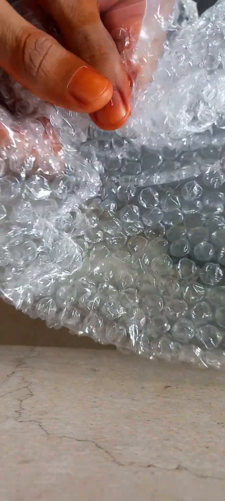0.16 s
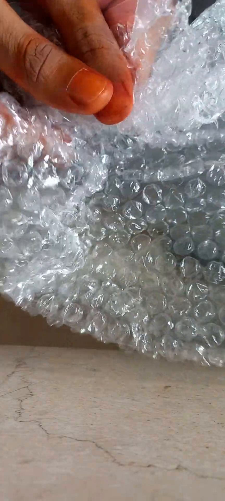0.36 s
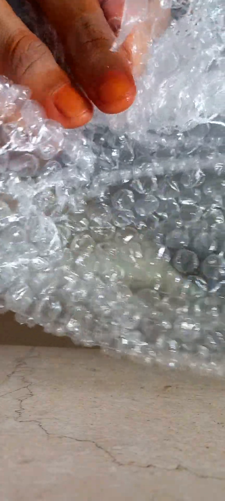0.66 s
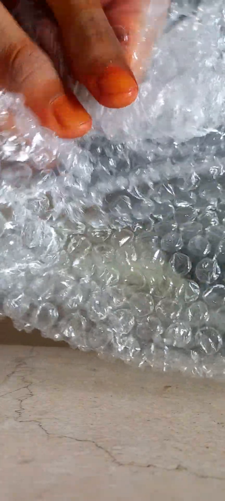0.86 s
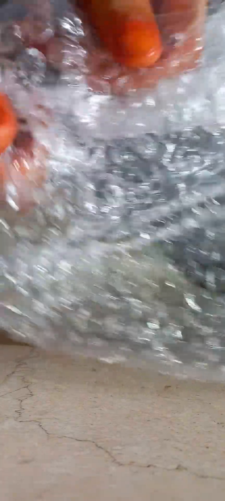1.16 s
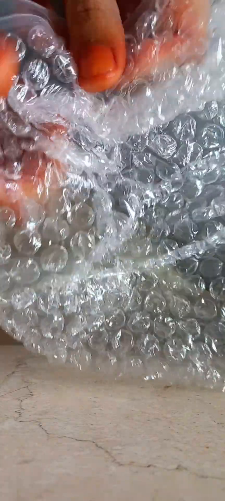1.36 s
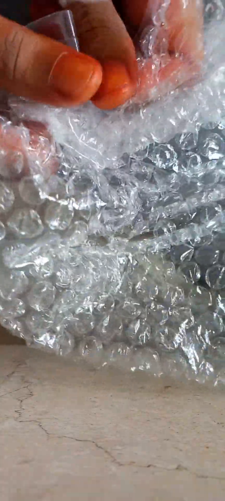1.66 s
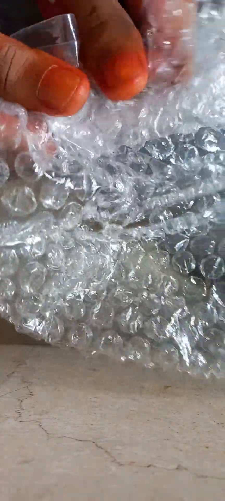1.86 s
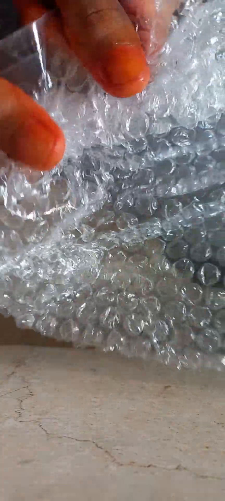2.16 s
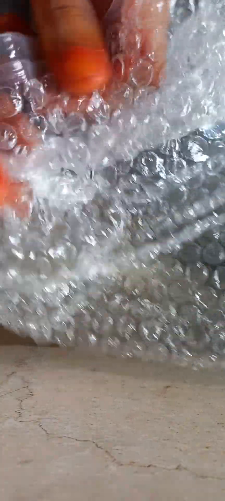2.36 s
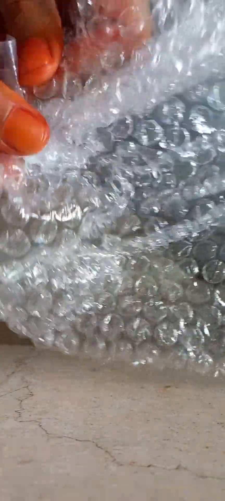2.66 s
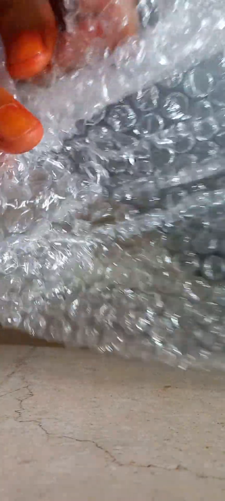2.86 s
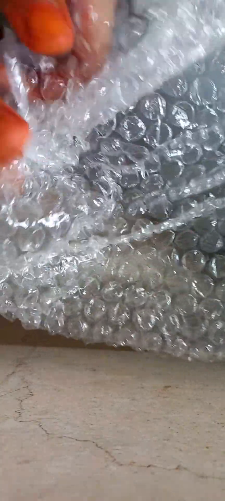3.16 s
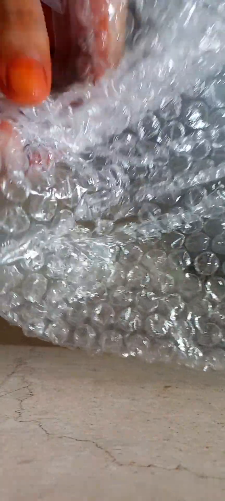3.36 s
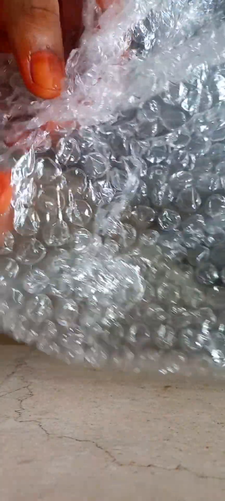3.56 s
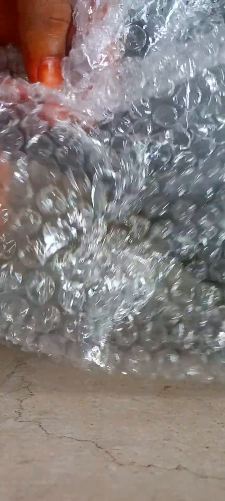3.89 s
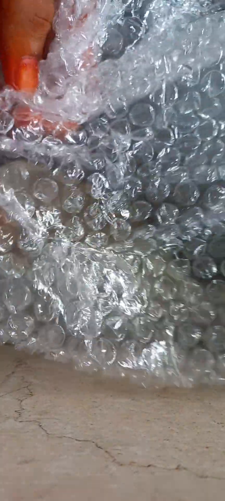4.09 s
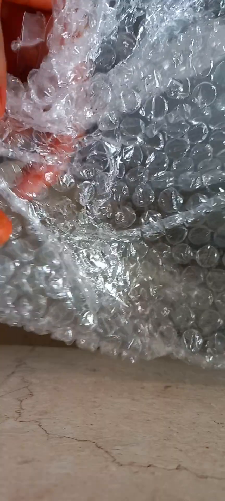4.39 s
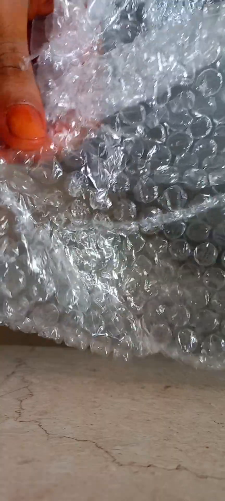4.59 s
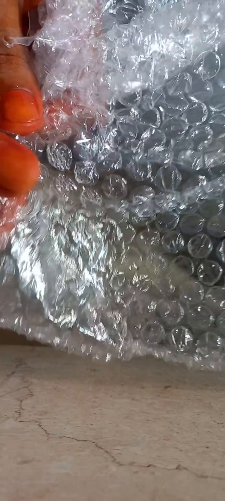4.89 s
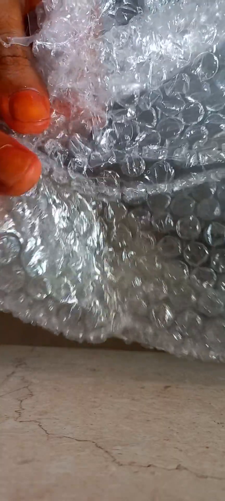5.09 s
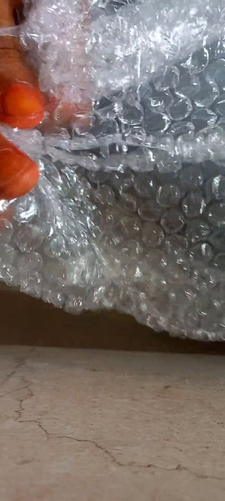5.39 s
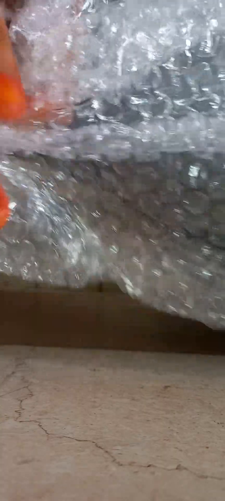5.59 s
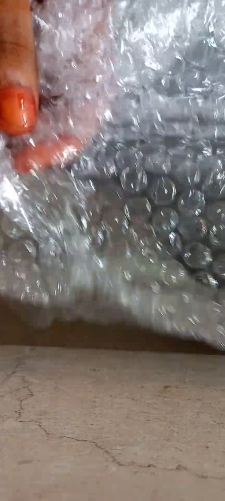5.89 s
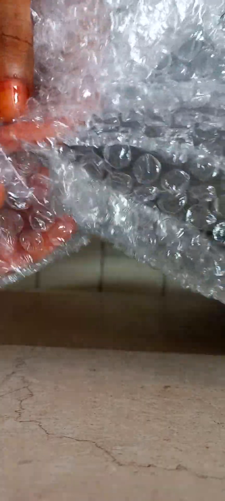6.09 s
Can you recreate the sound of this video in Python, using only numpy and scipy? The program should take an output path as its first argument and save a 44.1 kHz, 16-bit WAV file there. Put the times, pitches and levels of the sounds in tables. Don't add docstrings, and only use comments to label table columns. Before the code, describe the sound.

Hands squeeze and twist plastic bubble wrap close by, crinkling steadily with sharp bubble pops and dry snaps in a bare, echoing room over faint hum.

```python
import sys
import numpy as np
from scipy import signal
from scipy.fft import rfft, irfft
from scipy.io import wavfile
from scipy.ndimage import uniform_filter1d

SR = 44100
rng = np.random.default_rng(int(sys.argv[2]) if len(sys.argv) > 2 else 0)


def generate_wav(signal):
    frames = np.transpose(np.atleast_2d(signal))
    scaled = np.clip(frames, -1, 1) * 32767
    pcm = np.round(scaled).astype(np.int16)
    wavfile.write(sys.argv[1], SR, pcm)


def linear_from_db(decibels):
    return 10 ** (np.asarray(decibels, float) / 20)


N = 275184
START_DELAY_S = 0.0007


def evened(x):
    return x / np.sqrt(np.mean(x ** 2) + 1e-20)


def read(points, hz):
    f, value = np.transpose(points)
    return np.interp(np.log(hz + 1), np.log(f + 1), value)


def causal(gain_db):
    mirrored_db = np.r_[gain_db, gain_db[-2:0:-1]]
    log_gain = np.log(linear_from_db(np.maximum(mirrored_db, -100)))
    return np.fft.ifft(np.exp(np.conj(signal.hilbert(log_gain)))).real[:len(gain_db) - 1]


def band(x, lo_hz, hi_hz):
    return signal.sosfilt(signal.butter(2, [lo_hz, hi_hz], "bandpass", fs=SR, output="sos"), x)


def add(mix, s, sound):
    part = mix[round((s + START_DELAY_S) * SR):][:len(sound)]
    part += sound[:len(part)]


def joined(levels_db, rest_db):
    return np.sqrt((linear_from_db(levels_db) ** 2).sum(0) + linear_from_db(rest_db) ** 2)


# hz, likeness (0 to 1)
HUM_LIKENESS = [(60, 0.88), (150, 0.89), (400, 0.57), (1000, 0.22)]


def spread_noise(power):
    likeness = np.clip(read(HUM_LIKENESS, np.fft.rfftfreq(N, 1 / SR)), -1, 1)
    left, other = rfft(rng.standard_normal((2, N)))
    right = likeness * left + np.sqrt(1 - likeness ** 2) * other
    return evened(irfft(np.array([left, right]) * np.sqrt(power), N))


# hz, level_db (per Hz)
HUM_COLOUR = [(82, -20), (140, 4), (280, -5.5), (1590, -83), (1980, -23), (2770, -41), (5020, -24),
              (6120, -16), (7910, -53), (12500, -30), (15800, -14)]


def hum_floor():
    hz = np.fft.rfftfreq(N, 1 / SR)
    return linear_from_db(-55.5) * spread_noise(linear_from_db(read(HUM_COLOUR, hz)) ** 2)


def steadied(x, share):
    power = uniform_filter1d(uniform_filter1d((x ** 2).mean(0), size=5000), size=5000)
    return evened(x / (abs(power) + 0.03) ** (share / 2))


# pitch_hz, width_hz, level_db
MOTOR_TONES = [(99.15, 4.9, 2), (169.3, 3.26, -8), (109, 28.4, -9), (73.6, 25, -16.5)]
# time_s, level_db
DRONE_SWELL = [(0.0, -61.5), (0.21, -50), (0.42, -63), (0.52, -47.5), (0.82, -47.5), (1.02, -52),
               (1.36, -49), (2.59, -51), (2.82, -63), (3.04, -48), (3.42, -57), (3.6, -47), (4.05, -54),
               (4.19, -48.5), (5.49, -51), (5.61, -53.5), (6.01, -47), (6.24, -51)]


def drone(jolt):
    hz = np.fft.rfftfreq(N, 1 / SR)
    tones = sum(linear_from_db(db) ** 2 * np.exp(-2 * ((hz - pitch_hz) / width_hz) ** 2)
                for pitch_hz, width_hz, db in MOTOR_TONES)
    level = linear_from_db(np.interp(np.arange(N) / SR, *np.transpose(DRONE_SWELL))) + jolt
    return level * steadied(spread_noise(tones), 0.53)


def rumble(jolt):
    deep = np.exp(-2 * ((np.fft.rfftfreq(N, 1 / SR) - 58) / 18) ** 2)
    level = linear_from_db(np.interp(np.arange(N) / SR, [1.7, 1.8], [-75, -91.5])) + linear_from_db(-12) * jolt
    return linear_from_db(11.5) * level * spread_noise(deep)


# middle_s, level_db, length_s
FLOOR_JOLT = (2.005, -30, 0.052)


def hum():
    middle_s, db, length_s = FLOOR_JOLT
    jolt = linear_from_db(db) * np.exp(-(2 * (np.arange(N) / SR - middle_s) / length_s) ** 2)
    return hum_floor() + drone(jolt) + rumble(jolt)


# hz, level_db
MIC_RESPONSE = [(90, -70), (150, -5.5), (260, -1), (740, -0.5), (1600, -1), (3000, 1), (4700, 4.5),
                (6200, -0.5), (8300, -16), (10500, -9.5), (12500, -8), (15600, -13)]


def microphone_db(hz):
    return read(MIC_RESPONSE, hz)


def grains(lo_hz, hi_hz, per_s, spread_db, cycles, brush):
    clumps = linear_from_db(4.5 * evened(uniform_filter1d(rng.standard_normal(N), 900)))
    happens = rng.random(N) < clumps * per_s / SR
    size = linear_from_db(spread_db * np.minimum(rng.exponential(1, N), 5)) * happens
    pitches, t = np.geomspace(lo_hz, hi_hz, 8), np.arange(600) / SR
    kind = rng.integers(0, len(pitches), N)
    creases = np.zeros(N)
    for k, hz in enumerate(pitches):
        ring = np.sqrt(hz) * np.sin(2 * np.pi * hz * t) * np.exp(-hz * t / cycles)
        creases += signal.oaconvolve(size * (kind == k), ring)[:N]
    brushing = band(rng.standard_normal(N), 0.48 * lo_hz, min(hi_hz, SR / 2.2))
    colour = causal(microphone_db(np.fft.rfftfreq(2048, 1 / SR)))
    return evened(signal.oaconvolve(evened(creases) + brush * evened(brushing), colour)[:N])


# loudest_s, build_up_s, drag_db, slack_rustle_db
SLIDE_MOVES = [(0.14, 0.04, -63, -42.5), (0.51, .03, -64, -60), (0.6, 0.046, -44, -50.5),
               (0.7, 0.026, -46, -41), (0.89, 0.024, -46, -68), (1.2, 0.32, -51.5, -74),
               (2.0, 0.072, -38, -72), (2.64, 0.11, -80, -63.5), (3.0, 0.031, -77, -47),
               (3.53, 0.18, -56, -50.5), (3.95, 0.15, -52.5, -48), (4.29, 0.011, -37.5, -36.5),
               (4.67, 0.12, -47, -71), (5.04, 0.13, -59, -55), (5.39, 0.04, -47.5, -51),
               (5.72, 0.078, -56.5, -57.5), (5.91, 0.054, -50.5, -56), (6.04, .06, -54, -56)]


def slides(column):
    rows = np.transpose(SLIDE_MOVES)[:, :, None]
    t = np.arange(N) / SR - rows[0]
    shape_db = np.where(t < 0, 12 * t / rows[1], -85 * t)
    return joined(rows[column] + shape_db, -96)


# middle_s, length_s, effort_db, tautness_db
HAND_STROKES = [(0.0, 0.029, -47, 4), (0.226, 0.26, -41.5, -6), (0.493, 0.13, -55.5, 0.5),
                (0.76, 0.27, -60, 11.5), (1.18, 0.6, -52, 0.5), (1.571, 0.2, -49.5, 0),
                (1.832, 0.9, -57.5, 2.5), (2.35, 0.22, -49.5, -1.5), (2.59, 0.058, -58, 4.5),
                (2.677, 0.059, -55, 8.5), (2.984, 0.23, -53, -17), (3.22, 0.24, -53, 0),
                (3.526, 0.25, -46, -1), (3.755, 0.096, -47.5, -2.5), (3.934, 0.19, -46, 2.5),
                (4.293, 0.42, -57, 6), (4.624, 0.21, -47.5, -1.5), (4.974, 0.085, -50.5, 0),
                (5.04, 0.11, -60, 12), (5.308, 0.28, -56, 17), (5.655, 0.23, -50.5, 2),
                (5.746, 0.091, -55, 4), (5.952, 0.17, -47, 2.5), (6.056, 0.1, -50.5, 3.5),
                (6.19, 0.11, -50.5, 2)]
REST_DB = -67.5


def crinkle():
    middle_s, length_s, effort_db, taut_db = np.transpose(HAND_STROKES)[:, :, None]
    shape_db = -10 * abs(2 * (np.arange(N) / SR - middle_s) / length_s) ** 1.58
    mid = joined(effort_db + shape_db, REST_DB)
    high = joined(effort_db + taut_db + shape_db, REST_DB - 1)
    crackle = grains(2000, 6500, 1000, 4.1, 1.1, 0.15)
    fizz = grains(10000, 15500, 750, 3.4, 1.0, 0.3)
    rustle = grains(410, 1200, 350, 4.5, 1.4, 0.3)
    clicks = grains(3000, 15000, 120, 3, 0.3, 0.02)
    return mid * crackle + high * fizz + slides(column=3) * rustle + linear_from_db(-11) * np.sqrt(mid * high) * clicks


def shock(peak_db, bass_db, treble_db, ring_hz, ring_db, ring_share):
    hz = np.fft.rfftfreq(2048, 1 / SR)
    low = 1 / (1 + (hz / 1700) ** 4)
    high = 1 / (1 + (9500 / (hz + 1)) ** 8)
    ring = ring_db / (1 + ((hz - ring_hz) / (ring_share * ring_hz)) ** 2)
    pulse = causal(microphone_db(hz) + (bass_db + 16) * low + (treble_db + 16) * high + ring)
    return linear_from_db(peak_db + 25) * pulse / np.linalg.norm(band(pulse, 2500, 7000))


def scattered(pulse, chance, scatter_db, t60=0.013):
    t = np.arange(len(chance)) / SR
    folds = linear_from_db(scatter_db - 60 * t / t60) * np.clip(chance, -2, 2) ** 3 * (t > 0.0005)
    folds[0] = 1
    return np.convolve(pulse, folds)


# time_s, peak_db
THIN_TICKS = [(0.2755, -28.5), (0.3165, -47), (0.3397, -33), (0.4595, -39.5), (1.1283, -35),
              (1.3355, -38.5), (1.5655, -33), (1.581, -31), (1.7695, -36), (1.8413, -40), (2.56, -43),
              (3.2128, -43), (3.4713, -34), (3.5451, -35), (3.5695, -42), (3.724, -44), (3.7436, -42),
              (3.8932, -34), (3.9172, -51), (3.933, -32), (4.0976, -41), (4.2036, -43), (4.705, -34),
              (4.756, -34.5), (2.808, -50), (2.824, -48), (5.0987, -35), (6.0686, -36), (6.1614, -36),
              (6.1987, -30.5),
              (0.009, -42.0), (0.06, -44.0), (0.3205, -38.0), (0.3344, -40.0), (0.4716, -41.0),
                (0.487, -44), (0.662, -45), (0.801, -42.0), (0.8289, -48), (1.2326, -42.5), (1.299, -41),
                (1.3428, -46), (1.4092, -46.0), (1.4171, -41), (1.6899, -40), (2.3366, -46), (2.419, -43),
                (2.4645, -53), (2.5137, -50.0), (2.5888, -48), (2.7303, -41), (2.7428, -51), (2.7954, -50),
                (3.1536, -43), (3.199, -39.0), (3.4879, -36.0), (3.5174, -39), (3.5296, -43), (3.57, -38),
                (3.7607, -38), (3.7781, -44), (3.8321, -42), (3.9502, -36), (3.9913, -40), (4.0246, -39),
                (4.057, -37), (4.0824, -38), (4.1099, -38), (4.167, -44), (4.2108, -42.0), (4.26, -38),
                (4.6892, -38.0), (4.7339, -38), (4.7482, -48), (4.8167, -51), (4.8938, -45.0),
                (4.9879, -36.0), (5.0035, -37), (5.0214, -38), (5.1058, -32), (5.5097, -39), (5.5156, -37),
                (5.5822, -38), (5.7076, -39), (5.9611, -43), (6.1278, -44), (6.1373, -44), (6.1453, -39)]


def ticks():
    near = np.zeros(N)
    for s, peak_db in THIN_TICKS:
        pulse = shock(peak_db - 15, -28, -6, rng.uniform(11000, 15000), 5, 0.1)
        add(near, s, scattered(pulse, rng.standard_normal(300), -24))
    return near


# time_s, peak_db, ring_hz
DRY_SNAPS = [(0.0416, -33, 4230), (0.569, -36, 4400), (0.5805, -21.5, 4240), (0.5925, -28, 4340),
             (1.305, -36.5, 4530), (1.3477, -35, 4300), (1.3923, -41, 4070), (1.5596, -25, 3860),
             (1.6566, -36, 4530), (1.703, -31.5, 6040), (1.7317, -36, 4610), (1.758, -41, 4700),
             (1.827, -34, 4340), (2.379, -33.5, 4900), (2.584, -41.5, 4750), (2.615, -34.5, 4930),
             (2.7294, -47, 4820), (2.776, -47, 3800), (2.807, -44, 4820), (2.8803, -32.5, 5440),
             (2.924, -39, 4500), (3.3163, -40, 5430), (3.505, -38, 3520), (3.7062, -38, 3660),
             (4.0714, -35.5, 4600), (4.5784, -31, 5100), (4.7566, -35, 5500), (4.785, -35.5, 5400),
             (4.9187, -42, 5530), (5.5818, -34, 5160),
             (0.313, -36, 5360), (0.4561, -41, 4570), (0.487, -42, 5300), (0.509, -40, 5510),
                  (1.238, -42, 5210), (1.2995, -39, 5810), (1.3577, -46, 5080), (1.411, -41, 3880),
                  (1.5457, -34.0, 4650), (1.629, -33, 4300), (1.6847, -41.0, 4530), (1.7406, -38.0, 5040),
                  (1.8328, -41, 4260), (1.8489, -35, 5770), (2.419, -36.0, 4480), (2.485, -46.0, 3140),
                  (2.5334, -45, 5770), (2.5577, -45, 3600), (2.589, -41, 5120), (2.692, -37, 4240),
                  (2.6972, -38, 4120), (2.7956, -49.0, 5770), (2.862, -42, 2540), (2.9074, -43.0, 4740),
                  (3.184, -41, 3620), (3.3375, -45, 4350), (3.518, -42, 5000), (3.5454, -37, 4260),
                  (3.556, -38, 5250), (3.7183, -44, 2610), (3.7239, -34.5, 3450), (3.8004, -41, 4780),
                  (3.894, -31, 4960), (4.021, -33, 4220), (4.0824, -39, 5300), (4.0931, -37, 4820),
                  (4.1103, -45, 3880), (4.1434, -47, 5250), (4.1981, -41.0, 3060), (4.211, -39, 5250),
                  (4.4802, -27, 5470), (4.7486, -39.0, 5510), (4.8165, -46.0, 6070), (4.8942, -46.0, 5120),
                  (4.961, -38, 4870), (4.9763, -37.0, 5200), (4.9881, -36.0, 5340), (5.0807, -34, 5600),
                  (5.5097, -35, 5700), (5.598, -34.5, 5380), (5.6317, -43, 5380), (5.7076, -37, 4360),
                  (5.7979, -42, 4520), (5.9478, -34.5, 4800), (5.9615, -37, 5040), (6.1376, -43, 5130),
                  (6.1453, -42, 5080), (6.226, -39, 4740)]
# time_s, peak_db, bass_db
LAYERED_FOLDS = [(1.1282, -33, -7), (1.2333, -37, -5), (1.246, -39, -11), (1.4164, -40, -2.5),
                 (2.641, -40, -31), (3.2666, -40.5, -10), (3.4873, -30.5, -0.5), (3.5695, -37, 0),
                 (3.762, -32, -11), (3.883, -35, -16), (4.026, -30, -5.5), (4.2365, -38, -5),
                 (4.533, -24, -20), (4.628, -27, -10), (4.7076, -30.5, 2), (4.7332, -45, -16),
                 (4.9497, -40, -4.5), (5.062, -36, -10), (5.0994, -33, -6), (5.1142, -27, -22),
                 (5.2336, -38, -14), (5.707, -44, -22), (5.9335, -39, -11), (6.1645, -35.5, -4),
                 (6.1959, -27.5, -8.5), (6.2163, -33.5, -2),
                 (0.5813, -34, 7), (1.163, -43.5, 11), (4.675, -33.5, 7.5), (4.689, -47, 3), (5.073, -48, 6),
              (5.632, -44, -1), (5.960, -41.5, 12), (6.069, -36, -2), (6.084, -44, 5), (6.179, -39, -3)]


def snaps():
    near, sent = np.zeros((2, N))
    creases = [(s, db, -34, hz) for s, db, hz in DRY_SNAPS]
    for s, db, bass_db in LAYERED_FOLDS:
        creases.append((s, db, bass_db, 4750 * (1 + 0.12 * rng.uniform(-0.34, 1))))
    for s, peak_db, bass_db, ring_hz in creases:
        pulse = shock(peak_db - 10.5, bass_db, -12.5, ring_hz, 9.3, 0.21)
        add(near, s, scattered(pulse, rng.standard_normal(300), -25))
        add(sent, s, pulse)
    return near, sent


# time_s, peak_db, treble_db, cavity_ring_hz, sent_to_walls_db
BUBBLE_POPS = [(0.0751, -30.5, -26, 1710, 9.5), (0.0759, -29, -26, 5400, -10),
               (0.0846, -24.5, -19.5, 5280, 1), (0.1216, -15.5, -19.5, 4350, 0.5),
               (0.6718, -20.5, -23, 1910, 0.5), (0.6729, -30.5, -18, 5400, 4.5),
               (0.887, -14, -20, 5130, 1.5), (1.8817, -15.5, -14.5, 3720, 4),
               (1.9608, -10.5, -13, 4970, -0.5), (1.9886, -6.5, -11.5, 5600, 2),
               (2.0398, -7, -10.5, 4730, -8), (2.0566, -5, -7.5, 4150, -2), (2.0713, -13, -10, 4200, 1),
               (2.1123, -11.5, -12, 3880, -2), (2.8387, -48, 4, 7700, 8.5), (2.8393, -42, 1.5, 2960, -1),
               (2.9408, -11, -15.5, 5130, -2.5), (3.9168, -32, -27, 3000, 1),
               (4.2783, -9, -4.5, 4870, -1.5), (4.2968, -6.5, -23, 4830, -17),
               (4.3007, -16.5, -12, 1810, 9.5), (4.3007, -16, -3, 4000, -2.5),
               (5.1332, -18.5, -7, 4970, 5.5), (5.2129, -16.5, -4, 4400, 4.5),
               (5.2733, -22, -14, 2790, -1.5), (5.3822, -21.5, -20, 4100, -0.5),
               (5.686, -34.5, -7, 5940, 1)]
PILE_BASS_DB, LIFTED_BASS_DB, LIFT_S = -12, -17.5, 1.4


def pops():
    near, sent = np.zeros(N), np.zeros((2, N))
    t = np.arange(1800) / SR
    puff = linear_from_db(-11.5) * np.sin(2 * np.pi * 85 * t) * t / 0.012 * np.exp(1 - t / 0.0051)
    for k, (s, peak_db, treble_db, ring_hz, wall_db) in enumerate(BUBBLE_POPS):
        on_pile = s < LIFT_S
        deep_db = 9 * max(np.log2(4200 / ring_hz), 0)
        bass_db = (PILE_BASS_DB if on_pile else LIFTED_BASS_DB) - 0.17 * (treble_db + 30)
        damped = 0.11 * deep_db * on_pile
        narrow = 0.16 / (1 + deep_db / 22)
        direct = shock(peak_db + 1, bass_db, treble_db, ring_hz, 2 + deep_db, narrow + damped)
        add(near, s, scattered(direct, rng.standard_normal(300), -30))
        add(near, s, linear_from_db(peak_db + wall_db) * puff)
        to_walls = shock(peak_db + wall_db - 6.5, bass_db, 0.77 * treble_db - 5, ring_hz,
                         deep_db + 14 * damped, narrow + 1.38 * damped)
        add(sent[k % len(sent)], s, to_walls)
    return near, sent


# start_s, length_s, level_db, pitch_hz
PILE_GROANS = [
    (0.477, 0.22, -52.5, 420),
    (.81, 0.056, -53, 600),
    (1.52, 0.087, -57, 400),
    (3.55, 0.055, -48.5, 189),
    (4.3, 0.14, -50, 246),
]


def groans():
    out = np.zeros(N)
    for s, length_s, db, hz in PILE_GROANS:
        u = np.arange(SR // 2) / SR / length_s
        rub = evened(band(rng.standard_normal(len(u)), 0.8 * hz, 1.2 * hz))
        add(out, s, linear_from_db(db - 4.6 * u ** 3) * np.minimum(u / 0.1, 1) * rub)
    return out


def drag():
    rub = grains(190, 480, 300, 2.0, 2.0, 1.0)
    return linear_from_db(-4) * slides(column=2) * rub + groans()


# time_s, level_db, pitch_hz, t60_s
HOLLOW_TAP = (3.853, -35, 1000, .05)


def knock():
    near, t = np.zeros(N), np.arange(3000) / SR
    s, db, hz, t60 = HOLLOW_TAP
    add(near, s, linear_from_db(db - 60 * t / t60) * np.sin(2 * np.pi * hz * t) * np.minimum(t / 0.002, 1))
    return near


# hz, t60_s
ROOM_DECAY = [(200, 0.56), (600, 0.76), (1500, 0.78), (4000, 0.6), (9000, 0.61), (15000, 0.39)]
# delay_s, left_db, right_db
FIRST_ECHOES = [
    (.0052, -20, -30),
    (.0138, -21, -14),
    (.0195, -20, -19),
    (.024, -24, -19),
    (.0372, -18, -22),
]
# hz, tilt_db
WALL_TILT = [(300, 0.5), (4000, 0.5), (8000, 4), (14000, 1.5)]


def room(x):
    taps = np.zeros((2, SR))
    at = np.arange(0, SR - 10, 10) + rng.integers(0, 10, (2, SR // 10 - 1))
    t = at / SR
    chance = np.clip(rng.standard_normal(at.shape), -3, 2)
    uneven = linear_from_db(4 * np.exp(-t / 0.05) * chance)
    arrived = 0.3 * (t > 0.002) + 0.4 * np.clip((t - 0.0105) / 0.003, 0, 1)
    arrived += 0.35 * np.clip((t - 0.014) / 0.012, 0, 1)
    np.put_along_axis(taps, at, rng.choice([-1.0, 1.0], at.shape) * uneven * arrived, 1)
    hz, t, z = signal.stft(taps, SR, nperseg=256)
    decay = linear_from_db(-60 * t / read(ROOM_DECAY, hz)[:, None])
    tail = signal.istft(z * decay, SR, nperseg=256)[1][:, :SR]
    tail = tail / np.linalg.norm(tail, axis=1, keepdims=True)
    for s, left_db, right_db in FIRST_ECHOES:
        tail[:, round(s * SR)] += linear_from_db([left_db, right_db])
    tilt_db = read(WALL_TILT, np.fft.rfftfreq(256, 1 / SR))
    tail = np.array([np.convolve(side, causal(sign * tilt_db)) for side, sign in zip(tail, (-1, 1))])
    return signal.fftconvolve(x[None], tail, axes=1)[:, :N]


# hz, level_db
BODY_SHADOW = [(200, -13), (800, -11), (1700, -8), (2800, -15), (4000, -22), (5500, -18), (7700, -10),
               (14000, -21)]
LAG = 20


def ports(x):
    paths = scattered(np.ones(1), rng.standard_normal(300), -19, 0.022)
    own_db = 20 * np.log10(abs(rfft(paths, 4096)) + 0.05)
    shadow_db = read(BODY_SHADOW, np.fft.rfftfreq(4096, 1 / SR))
    smear = np.convolve(paths, causal(shadow_db - own_db))[:500]
    right = signal.oaconvolve(x, linear_from_db(-2) * np.r_[np.zeros(LAG), smear])[:N]
    return np.array([x, right])


def scene():
    machine, film = hum(), crinkle()
    thin = ticks()
    creases, creases_sent = snaps()
    near, sent = pops()
    bumps = drag()
    small = thin + creases + knock()
    small_sent = linear_from_db(-9) * creases_sent
    echoes = room(small_sent + linear_from_db(-7.5) * film + linear_from_db(-18.5) * bumps)
    echoes = echoes + linear_from_db(-5) * sum(map(room, sent))
    steady = ports(small + linear_from_db(1.5) * film) + linear_from_db([[1.5], [-2.5]]) * bumps + echoes + machine
    edge = signal.firwin(401, 15900, window=("kaiser", 9), fs=SR)
    return ports(near) + signal.oaconvolve(steady, edge[None], "same")


def excess(level_db, climb_db_per_s):
    climb = np.arange(N) * climb_db_per_s / SR
    return np.maximum(np.maximum.accumulate(level_db + climb) - climb, 0)


def roll_off(x):
    return signal.sosfilt(signal.butter(12, 17140, fs=SR, output="sos"), x)


AHEAD = 250


def record(dry):
    level_db = 20 * np.log10(abs(dry).max(0) + 1e-6)
    late_db = signal.lfilter(np.ones(60) / 60, 1, excess(level_db + 21.5, 756))
    over_db = excess(level_db + 1, 337)
    foreseen_db = np.r_[over_db[AHEAD:], np.zeros(AHEAD)]
    early_db = uniform_filter1d(np.maximum(over_db, foreseen_db), size=120)
    held = 0.89 * np.tanh(dry / linear_from_db(0.13 * late_db + 0.41 * early_db) / 0.92)
    top = signal.firwin(401, 16450, window=("kaiser", 9), fs=SR)
    held = signal.oaconvolve(held, top[None], "same")
    held = signal.sosfilt(signal.butter(2, 48, "highpass", fs=SR, output="sos"), held)
    return roll_off(held)


dry = scene()
out = record(dry)
generate_wav(out)
```